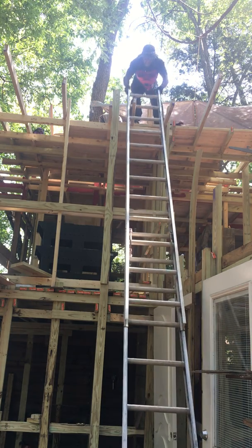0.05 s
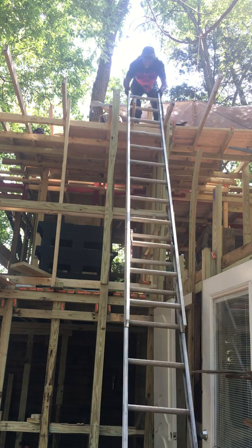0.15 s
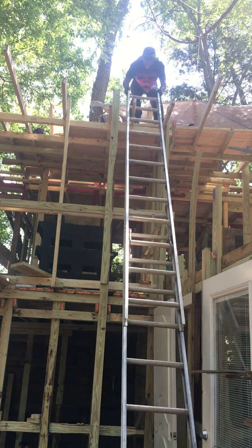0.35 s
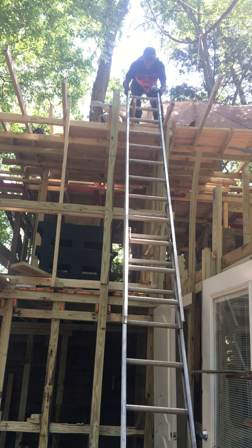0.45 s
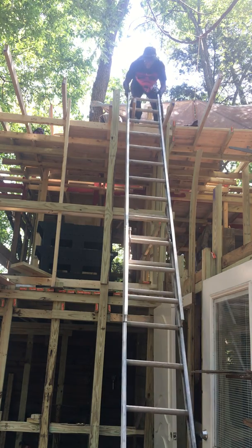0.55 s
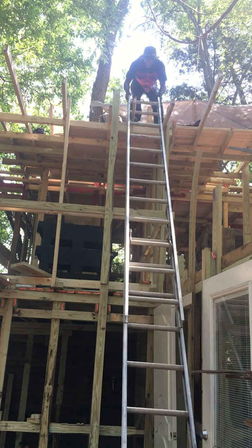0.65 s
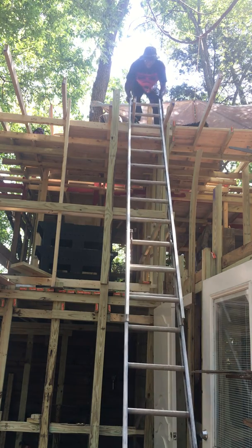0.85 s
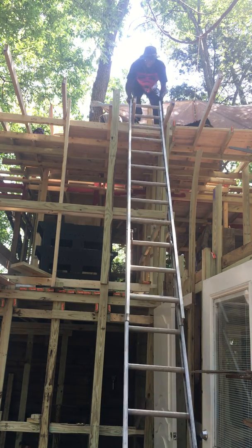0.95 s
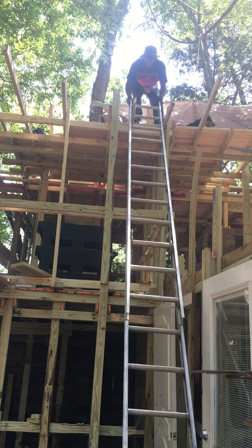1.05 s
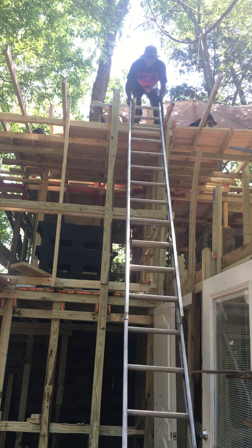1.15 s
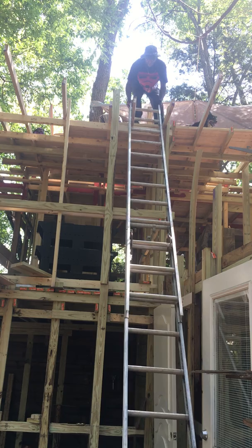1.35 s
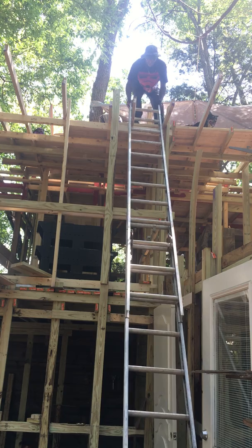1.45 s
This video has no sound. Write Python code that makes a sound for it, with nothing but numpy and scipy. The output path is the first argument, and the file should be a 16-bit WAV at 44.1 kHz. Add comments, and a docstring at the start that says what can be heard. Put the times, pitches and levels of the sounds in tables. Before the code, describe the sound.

Metal ladder handled outdoors, captured in mono from a few metres: early clatter and hollow knocks on wood, then regular sharp rung-lock clanks with a wavering high ring, soft metallic rubbing and very quiet outdoor air.

```python
"""Outdoors at a timber deck, an aluminium extension ladder is lowered, heard from some metres away.
Its rung locks clank: each blow rings clusters of decaying tones, with a crack and a jangle of noise.
One tone sings on and wavers; the sliding sections hum through the rails and hiss, driven by random slips.
The rails knock on the wood, mostly in two clusters of blows: noise bursts that also set the rails humming.
The timber frame answers with a short noise tail; shaped noise makes distant traffic and leaves."""
import sys
import numpy as np
from scipy import signal
from scipy.fft import rfft, irfft, next_fast_len
from scipy.io import wavfile
from scipy.ndimage import uniform_filter1d

SR = 44100
rng = np.random.default_rng(int(sys.argv[2]) if len(sys.argv) > 2 else 0)


def digitize_waveform(pressure):
    """Quantize a signal to 16-bit integers and store it at the path in sys.argv[1].

    Rows of a 2-D input are taken as channels; values are limited to [-1, 1].
    """
    field = np.atleast_2d(pressure).T
    bounded = np.clip(field, -1, 1)
    quanta = np.round(bounded * 32767).astype(np.int16)
    wavfile.write(sys.argv[1], SR, quanta)


def amplitude_ratio(level_db):
    """Convert a level in decibels to the matching linear amplitude (field) ratio."""
    exponent = np.asarray(level_db, float) / 20
    return 10 ** exponent


N = 66150  # length [samples]
NOISE_TOP_HZ = 15900  # hiss and air stop here


def unit(x):
    """Scales a sound to rms 1."""
    return x / np.sqrt(np.mean(x ** 2) + 1e-20)


def along(points, hz):
    """Reads a curve of (frequency [Hz], value) points on a log frequency axis."""
    point_hz, value = np.transpose(points)
    return np.interp(np.log(hz + 1), np.log(point_hz + 1), value)


def filtered(x, response):
    """Filters x by a complex response given as a function of frequency [Hz]."""
    size = next_fast_len(len(x) + SR // 2)
    spectrum = rfft(x, size) * response(np.fft.rfftfreq(size, 1 / SR))
    return irfft(spectrum, size)[:len(x)]


def tilt(hz, db_per_octave):
    """Gain of a spectral slope pivoting at 3 kHz, flat below 500 Hz and above 16 kHz."""
    return amplitude_ratio(db_per_octave * np.log2(np.clip(hz, 500, 16000) / 3000))


def dying(spectrum, t60s, tilt_db):
    """Half a second of shaped noise from rms 1, each frequency dying at its own speed."""
    noise = filtered(rng.standard_normal(SR // 2), lambda hz: amplitude_ratio(along(spectrum, hz)) * tilt(hz, tilt_db))
    hz, t, bins = signal.stft(unit(noise), SR, nperseg=128)
    t60 = np.clip(along(t60s, hz), .01, 2)[:, None]
    return signal.istft(bins * amplitude_ratio(-60 * t / t60), SR, nperseg=128)[1][:SR // 2]


def crunch(size, depth_db):
    """Fast random lumps of gain, as loose parts chatter."""
    lumps = unit(uniform_filter1d(rng.standard_normal(size), size=40))
    return amplitude_ratio(depth_db * np.clip(lumps, -2, 2))


def add(track, s, sound):
    """Mixes a sound into the track from time s; what falls outside the track is cut."""
    i = round(s * SR)
    part = sound[max(-i, 0):N - i]
    track[max(i, 0):][:len(part)] += part


# Metal-on-metal blows:
# (time [s], relative level [dB], treble tilt [dB per octave], shelf above 9.5 kHz [dB])
CLANK_BLOWS = [(-0.04, -19.5, -6, 0), (0.2356, -15, -7.5, -8), (.248, -22, 5.5, -6.5),
               (0.5005, -13, 0, -0.5), (0.7802, -11, 0.5, -0.5), (0.8202, -18.5, -2.5, -5),
               (.828, -25, 0, -3.5), (.837, -25, -2, -12), (.849, -51, 5, 10), (0.9174, -21, -1, -10),
               (1.0963, -15.5, -0.45, -7)]
# Ringing modes, each a cluster of alike parts:
# (frequency [Hz], spread [Hz], relative level [dB], decay t60 [s])
RING_MODES = [(2337, 36.7, -11.5, 0.19), (2840, 45, -24, 0.3), (3295, 68.2, -13, 0.2),
              (3473, 51, -13.5, 0.15), (3647, 17.6, -10.5, 0.31), (5424, 250, -14, 0.11),
              (5930, 380, -23.5, 0.068), (6570, 60, -8, 0.053), (6693, 62, -5, 0.14), (6910, 79, -2, 0.057),
              (7500, 45, -15.5, 0.032), (8480, 140, -10.5, 0.066), (9140, 276, -15.5, 0.072),
              (11130, 137, -14, 0.092), (13470, 640, -9, 0.056)]
# Spectrum of the loose parts: (frequency [Hz], relative density [dB per Hz])
JANGLE_SPECTRUM = [(150, -35), (500, -19.5), (1800, -13.5), (2800, -1.5), (3600, 1.5), (4600, -9),
                   (6700, 3.5), (8600, 0.5), (10300, -12.5), (13500, -9), (16000, -28), (17000, -64)]
# Decay of the loose parts: (frequency [Hz], t60 [s])
JANGLE_DECAY = [(300, 0.22), (2000, 0.17), (6000, 0.048), (15000, 0.073)]
PARTNER_DB, SCATTER_DB = -4, 3  # level of the parts beside the struck one; random spread of levels
PHASE_SPREAD_RAD = 1.27
RATTLE = .3  # blur of each line, as a share of its cluster's spread
CLANK_RISE_S = 0.0005  # of the whole blow, and of a mode at 6.7 kHz
JANGLE_DB, CRUNCH_DB = -3, 4
CRACK_DB, CRACK_T60_S = 6, 0.0022
SNAP_DB, SNAP_HZ, SNAP_DECAY_S = 13, 7400, 0.0008  # the first contact


def clanks():
    """Each blow rings clusters of decaying modes, with a contact snap, a crack and jangling loose parts."""
    out = np.zeros(N)
    t = np.arange(SR // 3) / SR
    # five alike parts per cluster: the struck one and four partners
    hz, spread_hz, level_db, t60 = np.repeat(RING_MODES, 5, axis=0).T[:, :, None]
    partner = (np.arange(len(hz)) % 5 > 0)[:, None]
    mode_rise = 1 - np.exp(-t / (CLANK_RISE_S * (6700 / hz) ** 3))  # low modes build up more slowly
    blow_rise = 1 - np.exp(-t / CLANK_RISE_S)
    snap = amplitude_ratio(SNAP_DB) * np.exp(-t / SNAP_DECAY_S) * np.sin(2 * np.pi * SNAP_HZ * t)
    for s, db, tilt_db, top_db in CLANK_BLOWS:
        # the struck part varies less from blow to blow
        shift, size, turn = rng.standard_normal((3, *hz.shape)) * np.where(partner, 1, .25)
        mode_db = level_db + PARTNER_DB * partner + SCATTER_DB * size
        gain = amplitude_ratio(mode_db - 60 * t / t60) * tilt(hz, tilt_db)
        # a random walk of phase blurs each line
        phase_steps = rng.standard_normal((len(hz), len(t)))
        wander = np.sqrt(2 * np.pi * RATTLE * spread_hz / SR) * phase_steps.cumsum(axis=1)
        phase = 2 * np.pi * (hz + spread_hz * shift) * t + PHASE_SPREAD_RAD * turn + wander
        ring = (gain * mode_rise * np.sin(phase)).sum(axis=0)
        # the same noise gives the brief crack and the longer jangle
        loose = dying(JANGLE_SPECTRUM, JANGLE_DECAY, tilt_db)[:len(t)]
        loose = loose * (amplitude_ratio(JANGLE_DB) + amplitude_ratio(CRACK_DB - 60 * t / CRACK_T60_S))
        blow = (ring + snap + loose * crunch(len(t), CRUNCH_DB)) * blow_rise
        shelved = filtered(blow, lambda f: amplitude_ratio(top_db / (1 + (9500 / (f + 1)) ** 8)))
        add(out, s, amplitude_ratio(db - 12) * shelved)
    return out


# Decay of the timber: (frequency [Hz], t60 [s])
FRAME_DECAY = [(300, 0.42), (3000, 0.27), (12000, 0.1)]


def frame(hits):
    """The timber frame's short answer: the hits convolved with a delayed, dying noise tail of unit energy."""
    delay_s = 0.0092
    tail = np.pad(dying([(20, 0)], FRAME_DECAY, 0), (round(delay_s * SR), 0))
    return signal.fftconvolve(hits, tail / np.linalg.norm(tail))[:N]


# The tone that sings on and wavers, as alike rungs beat; one list per stretch: (time [s], level [dB])
SONG_STRETCHES = [
    [(0.0, -41), (0.014, -43), (0.17, -74.5), (0.2, -57)],
    [(0.249, -47), (0.259, -32.5), (0.367, -61), (0.39, -56)],
    [(0.503, -28), (0.56, -44), (0.59, -50), (0.635, -46), (0.76, -66)],
    [(0.783, -36), (0.86, -43.5), (0.95, -42), (0.982, -49), (1.002, -62), (1.095, -49)],
    [(1.099, -31.5), (1.148, -36.5), (1.162, -33.5), (1.207, -47.5), (1.25, -40.5), (1.4, -57.5),
     (1.5, -68)],
]
# Pitch of each stretch: (frequency [Hz])
SONG_PITCHES = [2491, 2496, 2494, 2484, 2490]


def song():
    """The long-ringing tone: a sine that enters anew for each stretch and follows its level curve."""
    rise_s = 0.001212
    out = np.zeros(N)
    for hz, rows in zip(SONG_PITCHES, SONG_STRETCHES):
        s, db = np.transpose(rows)
        t = np.arange(s[0], s[-1] + 4 * rise_s, 1 / SR)
        fade_in = 1 - np.exp(-(t - s[0]) / rise_s)
        fade_out = 1 - np.exp((t - t[-1]) / rise_s)
        tone = np.sqrt(2) * np.sin(2 * np.pi * hz * t)
        # placed two rise times early
        add(out, s[0] - 2 * rise_s, amplitude_ratio(np.interp(t, s, db)) * tone * fade_in * fade_out)
    return out


# Resonances of the long rails; the two falls land on different spots:
# (frequency [Hz], width [Hz], first fall level [dB], second fall level [dB], sliding level [dB])
RAIL_MODES = [(410.3, 12, -1.5, 1.5, -0.5), (460, 26, -1.5, 1, -8.5), (582.6, 14.3, -16, -6, 3.5),
              (655.3, 15.8, 4.5, -15, -3.5), (700.3, 15.6, -2.5, -4, -12.5), (785, 21, 4, 0, -8.5),
              (1079, 11, -24, -5, -13), (1150, 30, -3, 2, -12.5), (1562, 15, -19, -4, -2.5),
              (1964, 24.5, -1.5, -5, -5), (2134, 46, -5, -4, -16), (2703, 19, -8, -6, -9),
              (3240, 24, 1.5, -38, -8)]


def rails(x, excitation):
    """Rail resonances as the first fall (0), the second fall (1) or the sliding (2) excites them."""
    def response(f):
        total = 0
        for k, (center, width, *db) in enumerate(RAIL_MODES):
            band = 1j * f * width / (center * center - f * f + 1j * f * width)
            total = total + (-1) ** k * amplitude_ratio(db[excitation]) * band  # signs alternate
        return total
    return filtered(x, response)


def slips():
    """Irregular slips of rubbing metal: sparse random impulses, 2500 per second on average."""
    happens = rng.random(N) < 2500 / SR
    return happens * amplitude_ratio(rng.uniform(-4.2, 9.9, N)) * rng.standard_normal(N)


# Sliding sections: (time [s], level of the rails' hum [dB], level of the hiss [dB])
SLIDE_LEVELS = [(0, -54, -49), (0.048, -60, -65.5), (.19, -64, -68.5), (.3, -49, -65), (.36, -50, -53.5),
                (.57, -49.5, -44), (0.656, -54, -48.5), (0.698, -51, -57), (.77, -62.5, -60.5),
                (.86, -52.5, -46.5), (.96, -51.5, -50.5), (1.04, -51.5, -51.5), (1.18, -46.5, -53),
                (1.3, -53.5, -53), (1.4, -53.5, -53), (1.5, -58, -55.5)]
# Spectrum of the hiss: (frequency [Hz], relative density [dB per Hz])
HISS_SPECTRUM = [(470, -27), (800, -10.5), (1460, -15), (2350, -9.5), (2530, -1.5), (2630, -11),
                 (6820, -16), (16000, -32.5)]


def slide():
    """Small slips make the rails hum; other slips mixed into steady noise make a thin hiss."""
    s, hum_db, hiss_db = np.transpose(SLIDE_LEVELS)
    t = np.arange(N) / SR
    hum = unit(filtered(rails(slips(), excitation=2), lambda hz: tilt(hz, -3)))
    rub = unit(slips()) * 0.49 + rng.standard_normal(N)
    hiss = unit(filtered(rub, lambda hz: amplitude_ratio(along(HISS_SPECTRUM, hz)) * (hz < NOISE_TOP_HZ)))
    return amplitude_ratio(np.interp(t, s, hum_db)) * hum + amplitude_ratio(np.interp(t, s, hiss_db)) * hiss


# Spectrum of distant traffic and leaves: (frequency [Hz], relative density [dB per Hz])
AIR_SPECTRUM = [(15, -28), (30, -17), (60, -1), (110, -6.5), (150, -16), (373, -19), (575, -27),
                (800, -23.5), (1740, -30), (3080, -82), (7500, -36.5), (10500, -50), (13500, -36.5),
                (16000, -40)]


def air():
    """Distant rumble and leaves: steady shaped noise at -52 dB rms."""
    noise = rng.standard_normal(N)
    return amplitude_ratio(-52) * unit(filtered(noise, lambda hz: amplitude_ratio(along(AIR_SPECTRUM, hz)) * (hz < NOISE_TOP_HZ)))


# Rail-on-wood blows: (time [s], relative level [dB], treble tilt [dB per octave])
KNOCK_BLOWS = [(0.202, -23, -3.5), (0.2118, -20, 5), (0.2243, -13, 2.05), (0.2395, -25, -1),
               (0.26, -22.5, 0.1), (0.2697, -31, -1), (0.367, -41, 6), (0.375, -37, 2), (0.3865, -20, 4.5),
               (0.3955, -12.5, 4.5), (0.405, -15.5, 1.5), (0.426, -21, -2), (0.447, -25.5, -1),
               (0.782, -31, -3), (0.894, -41.5, 3), (1.155, -32, 0.5)]
# Spectrum of the planks: (frequency [Hz], relative density [dB per Hz])
KNOCK_SPECTRUM = [(59, -43), (100, -3), (283, -7.5), (768, -6.5), (910, -7.5), (1720, -3.5), (3190, 0.5),
                  (3780, 0), (13500, -21), (15800, -34), (16300, -80)]
# Decay of the planks: (frequency [Hz], t60 [s])
KNOCK_DECAY = [(200, 0.084), (1000, 0.23), (3000, 0.045), (8000, 0.071), (15000, 0.039)]
PLANK_DB, RAIL_HUM_DB = -8.5, 7
KNOCK_RISE_S, KNOCK_CRUNCH_DB = 0.0015, 3.5
SECOND_FALL_S = .35  # from here on the rails are struck at the second spot


def knocks():
    """Each blow is a noise burst from the planks, whose first 10 ms push the rails into humming."""
    planks, push = np.zeros(N), np.zeros(N)
    rise = 1 - np.exp(-np.arange(SR // 2) / SR / KNOCK_RISE_S)
    for s, db, tilt_db in KNOCK_BLOWS:
        burst = dying(KNOCK_SPECTRUM, KNOCK_DECAY, tilt_db) * crunch(SR // 2, KNOCK_CRUNCH_DB)
        burst = amplitude_ratio(db) * burst * rise
        add(planks, s, amplitude_ratio(PLANK_DB) * burst)
        add(push, s, burst[:SR // 100])
    late = np.arange(N) > SECOND_FALL_S * SR
    hum = rails(push * ~late, excitation=0) + rails(push * late, excitation=1)
    return planks + amplitude_ratio(RAIL_HUM_DB) * hum


def scene():
    """Mixes the ladder, the frame's answer to its blows (-11.5 dB) and the air, in mono."""
    hits = clanks() + knocks()
    mix = hits + amplitude_ratio(-11.5) * frame(hits) + song() + slide() + air()
    return mix[None]


def top_cut(x):
    """Nothing passes above the cut-off."""
    return signal.sosfilt(signal.butter(12, 16670, fs=SR, output="sos"), x)


def record(dry):
    """Delivers the finished mix."""
    return top_cut(dry)


dry = scene()
out = record(dry)
digitize_waveform(out)
```